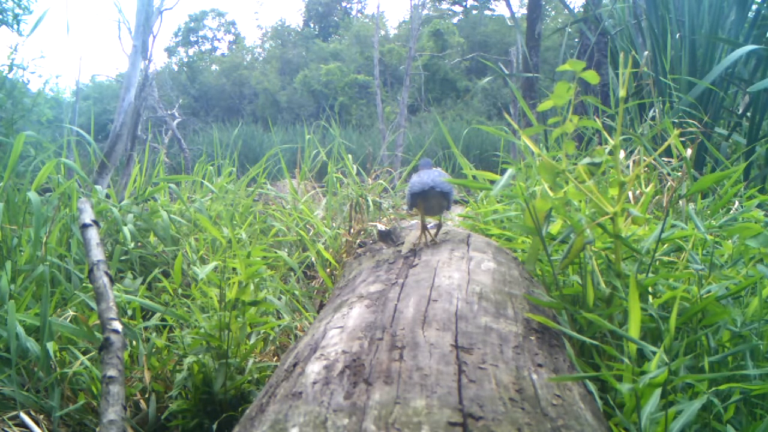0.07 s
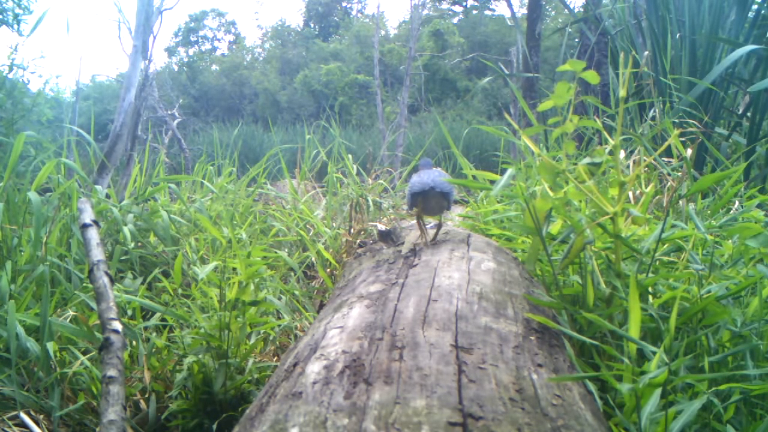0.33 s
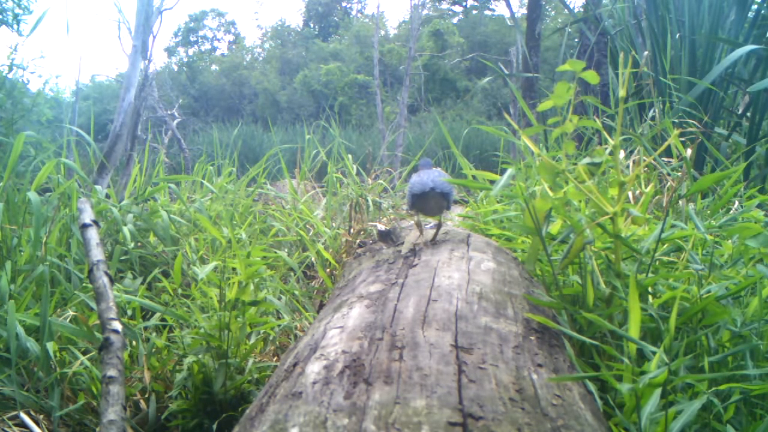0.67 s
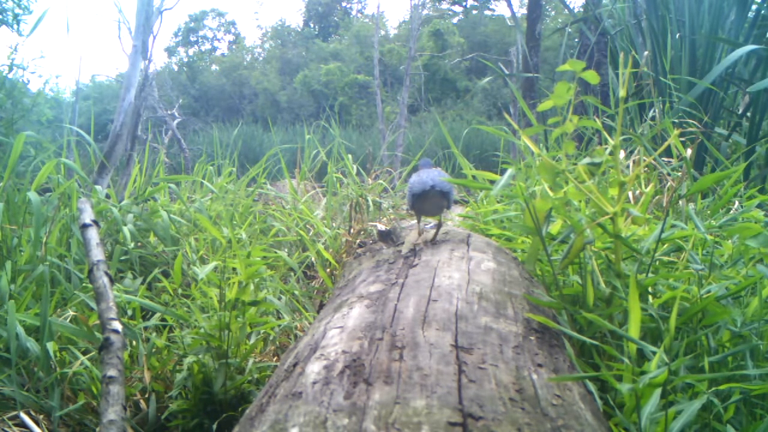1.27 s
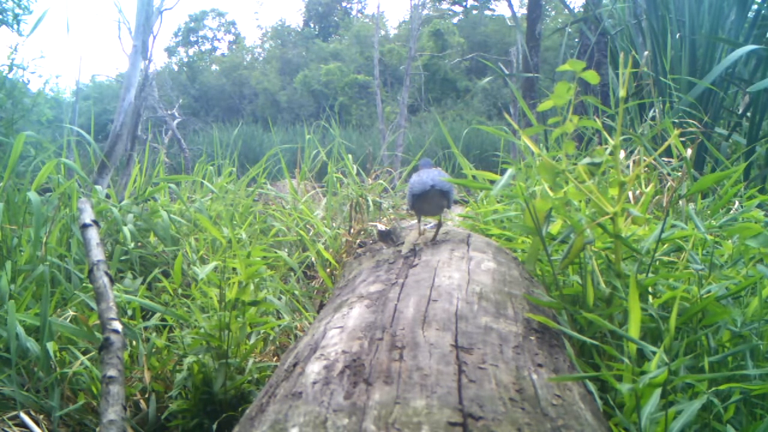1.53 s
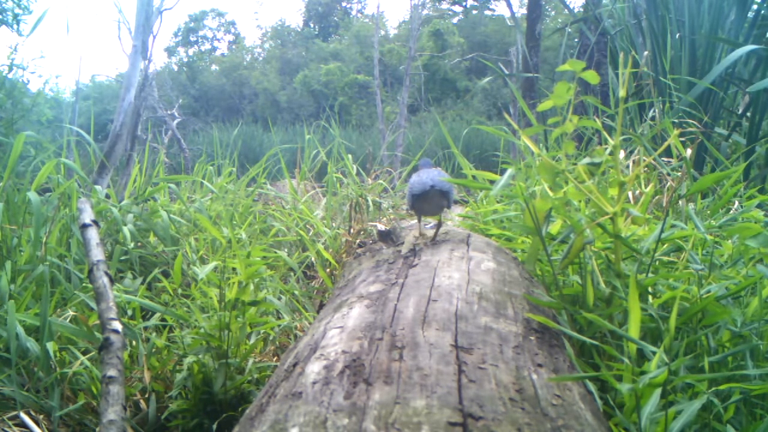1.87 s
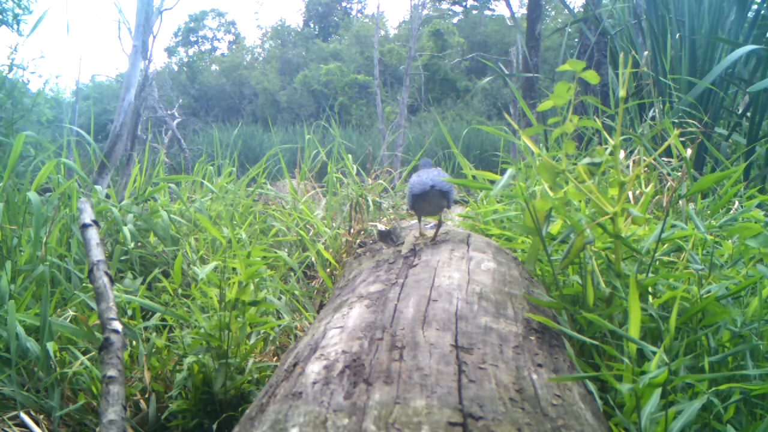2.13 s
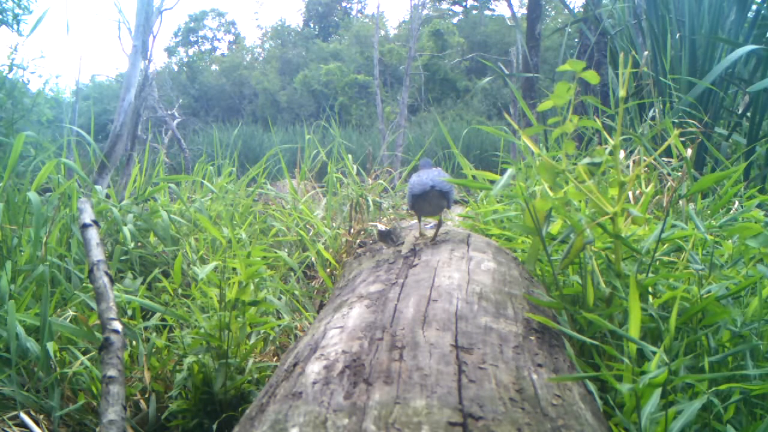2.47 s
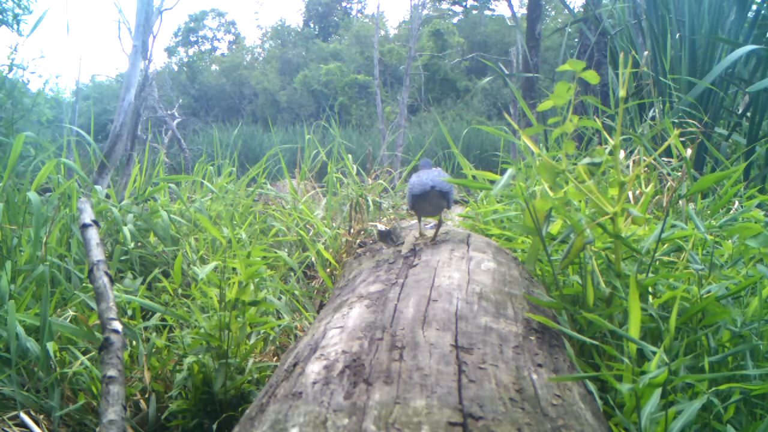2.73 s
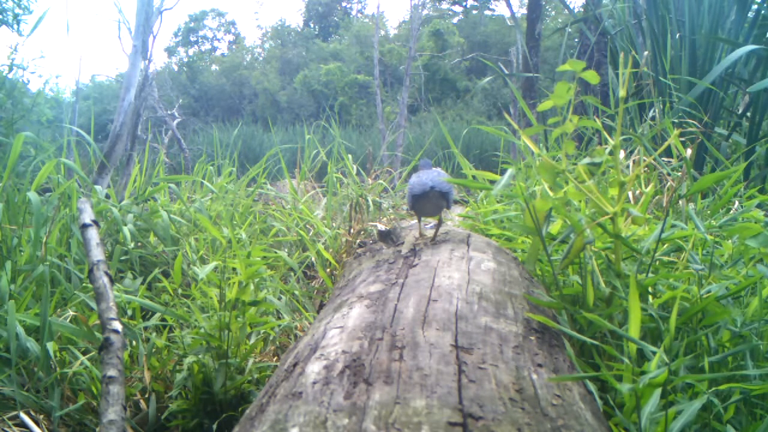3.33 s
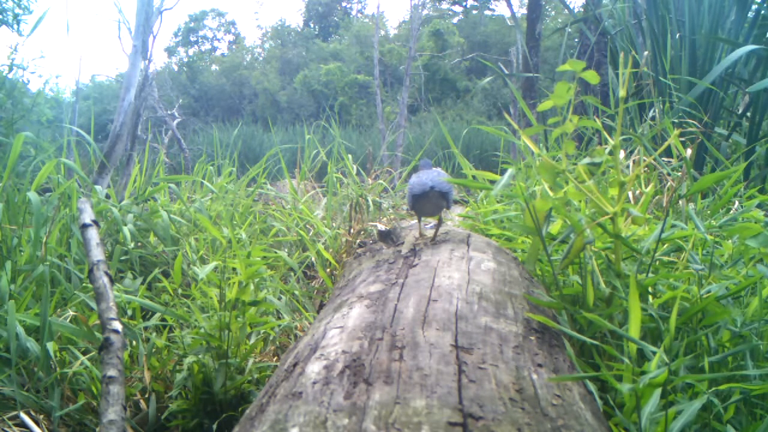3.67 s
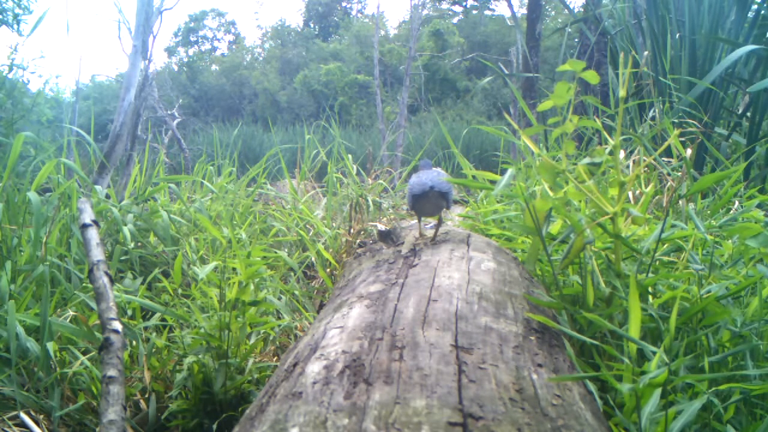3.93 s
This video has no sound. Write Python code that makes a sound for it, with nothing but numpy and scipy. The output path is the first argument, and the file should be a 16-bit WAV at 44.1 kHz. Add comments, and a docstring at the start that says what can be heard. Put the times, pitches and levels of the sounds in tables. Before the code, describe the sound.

Steady low rumble and hiss with a fine pulsing, and faint drips in a quiet marsh.

```python
"""A fine, even pulsing over low rumble, open air and hiss: a small camera's own electronics
leak into its microphone in a quiet marsh. A distant bird gives a few thin chirps, drops tick
on leaves near and far, and dry stems crackle, all with a short echo from reeds and trees.
The camera's slow sampling narrows the band."""
import sys
import numpy as np
from scipy import signal
from scipy.fft import rfft, irfft, next_fast_len
from scipy.io import wavfile
from scipy.ndimage import uniform_filter1d, map_coordinates

SR = 44100
rng = np.random.default_rng(int(sys.argv[2]) if len(sys.argv) > 2 else 0)


def store_wav(level_fs):
    """Save 16-bit WAV to argv[1]."""
    pcm = np.round(np.clip(np.atleast_2d(level_fs), -1, 1) * 32767)
    wavfile.write(sys.argv[1], SR, pcm.T.astype(np.int16))


N = 176400


def amp(db):
    """Decibels to gain."""
    return 10 ** (np.asarray(db) / 20)


def unit(x):
    """x at rms 1."""
    return x / np.sqrt(np.mean(x ** 2) + 1e-20)


def along(points, hz):
    """(Hz, value) points read on a log axis."""
    f, v = np.transpose(points)
    return np.interp(np.log(hz + 1), np.log(f + 1), v)


def filtered(x, response):
    """x times a response of frequency."""
    m = next_fast_len(N + SR // 2)
    return irfft(rfft(x, m) * response(np.fft.rfftfreq(m, 1 / SR)), m)[:N]


def fade(t, t60):
    """Exponential decay."""
    return np.exp(-np.log(1000) * t / t60)


def add(track, s, sound):
    """Mix a sound into a track at a time."""
    part = track[max(round(s * SR), 0):][:len(sound)]
    part += sound[:len(part)]


def noise(spectrum, patchy_db):
    """Coloured noise of rms 1 with patches of random gain."""
    z = signal.stft(rng.standard_normal(N), nperseg=256)[2]
    field = uniform_filter1d(uniform_filter1d(rng.standard_normal(z.shape), size=4, axis=0), size=5, axis=1)
    x = signal.istft(z * amp(patchy_db * unit(field)), nperseg=256)[1][:N]
    return unit(filtered(x, lambda hz: amp(along(spectrum, hz))))


def pulsing(cycle_s=.066952, sag_s=.01, swing_hz=19.8):
    """A load in the camera switches on and off 15 times a second; each voltage step sags past zero."""
    steps, t = np.zeros(N), np.arange(SR // 10) / SR
    for first_s, db, sign in ((.005936, -30.5, 1), (.032405, -34, -1)):  # on, off
        at = (np.arange(first_s, N / SR, cycle_s) * SR).astype(int)
        steps[at] = sign * amp(db + rng.standard_normal(len(at)))
    sag = np.exp(-t / sag_s) * np.cos(2 * np.pi * swing_hz * t)
    return signal.fftconvolve(steps, sag)[:N]


# Open air over the marsh, all around the microphone (frequency [Hz], relative level [dB])
AIR_SPECTRUM = [(100, 1.5), (250, -1.5), (700, -3), (1150, -3.5), (1480, -1), (1600, -7), (2000, -5),
                (2350, -5.5), (2700, -2), (3050, -5.5), (3450, -12), (4050, -9.5), (4500, -12),
                (5300, -11.5), (6400, -16), (9000, -24.5)]
# Contour of its swell (time [s], relative level [dB])
AIR_CONTOUR = [(0.0, -55.5), (1.0, -54.5), (1.3, -55.5), (1.75, -55), (2.87, -55.5), (3.52, -55.5),
               (3.62, -55.5), (4.0, -53)]
def air(level_db=-51.5, swell_share=.7):
    """A soft wash of open air that swells a little."""
    contour_db = np.interp(np.arange(N) / SR, *np.transpose(AIR_CONTOUR))
    swell_db = swell_share * (contour_db - contour_db.mean())
    return amp(level_db + swell_db) * noise(AIR_SPECTRUM, patchy_db=1.78)


# Low rumble at the microphone (frequency [Hz], relative level [dB])
RUMBLE_SPECTRUM = [(5, -25), (14, 0.5), (35, -2.5), (60, -10.5), (76, -2.5), (95, -14), (122, -15.5),
                   (170, -22), (400, -34.5), (1500, -60.5)]
def rumble(level_db=-44.5):
    """Steady, deep noise under the whole marsh."""
    return amp(level_db) * noise(RUMBLE_SPECTRUM, patchy_db=-.9)


# Noise floor inside the camera (frequency [Hz], relative level [dB])
HISS_SPECTRUM = [(500, -13.5), (6300, -13.5), (6650, -2.5), (6850, -1), (7000, 0.5), (7250, 2), (8000, 1),
                 (9000, -3)]
def hiss(level_db=-56.5):
    """The microphone's amplifier adds a high, steady hiss."""
    return amp(level_db) * noise(HISS_SPECTRUM, patchy_db=1.0)


# A bird far off in the marsh (time [s], length [s], start pitch [Hz], end pitch [Hz], level [dB])
BIRD_CHIRPS = [(0.146, 0.039, 3850, 4600, -55.5), (0.251, 0.047, 3800, 4490, -50.5),
               (.368, 0.042, 3850, 4520, -54.5), (1.335, 0.025, 4400, 3850, -51.5),
               (1.468, 0.028, 4500, 3750, -53), (1.803, 0.026, 4000, 4200, -53.5),
               (2.85, 0.042, 4500, 3850, -52.5), (3.907, .035, 5360, 5620, -54)]
def bird(blur_rad=1, flutter_per_s=600):
    """Thin glides swell and fade; the scattered path to the microphone blurs their phase."""
    out = np.zeros(N)
    for s, length, start_hz, end_hz, db in BIRD_CHIRPS:
        progress = np.linspace(0, 1, int(length * SR))
        blur = blur_rad * map_coordinates(rng.standard_normal(64), [progress * length * flutter_per_s])
        phase = 2 * np.pi * np.cumsum(start_hz + (end_hz - start_hz) * progress) / SR
        add(out, s, amp(db) * np.sin(np.pi * progress) * np.sin(phase + blur))
    return out


def far_events(per_s, floor_db, hz, octaves, spread_db=4.5):
    """Faint random events far from the microphone: rows of (time [s], level [dB], pitch [Hz])."""
    when, strength, pitch = rng.random((int(per_s * N / SR), 3)).T
    db = floor_db - spread_db * np.log(np.maximum(strength, np.exp(-2)))
    return np.column_stack([when * N / SR, db, hz * 2 ** (octaves * (pitch - .5))])


# Drops on leaves near the microphone (time [s], relative level [dB], pitch [Hz])
NEAR_DROPS = [(0.2252, -45, 2300), (0.4504, -44, 2100), (0.4982, -48, 2500), (0.701, -36, 2670),
              (0.7538, -41.5, 2960), (0.8823, -36.5, 2350), (1.0408, -39.5, 2700), (1.133, -37, 2560),
              (1.4675, -43, 2530), (1.6607, -41, 2540), (1.7743, -41.5, 2890), (1.8512, -41, 2080),
              (1.9285, -40.5, 2010), (2.2482, -41, 2320), (2.6518, -35.5, 2640), (2.6704, -35.5, 2440),
              (2.7755, -41.5, 2890), (2.808, -41.5, 2430), (2.8382, -36, 2900), (3.1797, -39.5, 2650),
              (3.2439, -35.5, 2120), (3.3031, -36, 2630), (3.3244, -32.5, 2570), (3.3531, -36.5, 2580),
              (3.443, -39.5, 3050), (3.5372, -37, 2560)]
# Lower taps of drops on broad leaves (time [s], relative level [dB], pitch [Hz])
BROAD_LEAF_TAPS = [(0.296, -38, 1340), (0.8, -37.5, 724), (1.574, -44.5, 1480), (1.946, -38, 1790),
                   (2.252, -39, 1490)]
def drops(t60_s=.014, rise_s=.00044, splash_db=-12.5):
    """Each drop strikes a leaf with a tiny splash and a brief damped ring."""
    out, t = np.zeros(N), np.arange(SR // 20) / SR
    far = far_events(per_s=60, floor_db=-51, hz=2376, octaves=.8)
    attack = 1 - np.exp(-t / rise_s)
    for rows, gain_db in (([*NEAR_DROPS, *far], 3.5), (BROAD_LEAF_TAPS, 3)):
        for s, db, hz in rows:
            ring = np.sin(2 * np.pi * hz * t)
            splash = amp(splash_db) * rng.standard_normal(len(t))
            decay = fade(t, t60_s * np.exp(.2 * rng.standard_normal()))
            add(out, s + .0007, amp(db + gain_db) * (ring + splash) * attack * decay)
    return out


# Dry stems near the microphone (time [s], relative level [dB], pitch [Hz])
NEAR_TICKS = [(0.343, -43, 5380), (0.9014, -39, 4000), (1.042, -36.5, 5340), (1.316, -43, 5160),
              (1.3941, -45, 5950), (1.5414, -45, 4900), (1.9583, -46, 4330), (2.1659, -41.5, 4320),
              (2.286, -39.5, 4680), (3.0765, -43, 5730), (3.3251, -43, 4080), (3.3683, -45.5, 5350),
              (3.4198, -43.5, 4450), (3.4374, -47, 5130), (3.5847, -45, 5280), (3.7577, -44.5, 4720),
              (3.8974, -41, 5000)]
def stem_ticks(gain_db=-5, t60_s=.03, width_hz=1200):
    """Each tick of a stem is a short burst of noise in one high, broad resonance."""
    out, t = np.zeros(N), np.arange(SR // 10) / SR
    bins_hz = np.fft.rfftfreq(len(t), 1 / SR)
    far = far_events(per_s=10, floor_db=-55.5, hz=4850, octaves=.41)
    for s, db, hz in [*NEAR_TICKS, *far]:
        resonance = 1 / (1 + (2 * (bins_hz - hz) / width_hz) ** 2)
        burst = unit(irfft(rfft(rng.standard_normal(len(t))) * resonance))
        add(out, s + .001, amp(db + gain_db) * burst * fade(t, t60_s))
    return out


def reed_echo(x, level_db=-11, t60_s=.27):
    """Reeds and trees scatter sound back to the microphone as a short, diffuse tail."""
    t = np.arange(SR // 2) / SR
    tail = rng.standard_normal(len(t)) * fade(t, t60_s)
    return amp(level_db) * signal.fftconvolve(x, tail / np.linalg.norm(tail))[:N]


def scene():
    """One microphone in the marsh: small sounds behind the air and the camera's own noise."""
    steady = pulsing() + air() + rumble() + hiss()
    marsh = bird() + drops() + stem_ticks()
    return (steady + marsh + reed_echo(marsh))[None]


# Notched top edge of the camera's band (frequency [Hz], gain [dB])
CAMERA_EDGE = [(7280, 0), (7450, -13), (7500, -26), (7550, -14), (7740, -2), (8020, 0), (8270, -10),
               (8500, -35), (8700, -22), (8950, -33)]
def record(dry):
    """The camera samples slowly, so the top of its band is mirrored upward, then notched and cut off."""
    half_rate_hz, top_hz = 8000, 9000
    band = filtered(dry[0], lambda hz: hz < half_rate_hz)
    mirror = band * 2 * np.cos(2 * np.pi * 2 * half_rate_hz * np.arange(N) / SR)
    return filtered(band + mirror, lambda hz: amp(along(CAMERA_EDGE, hz)) * (hz < top_hz))[None]


dry = scene()
out = record(dry)
store_wav(out)
```